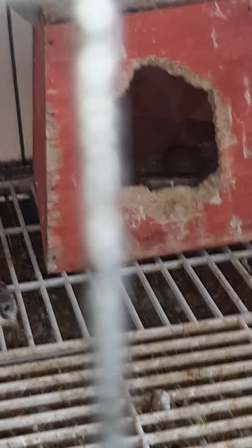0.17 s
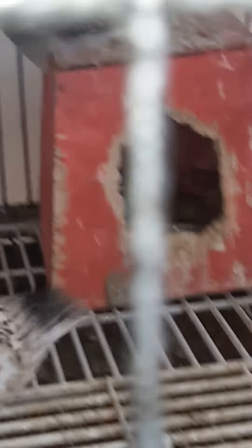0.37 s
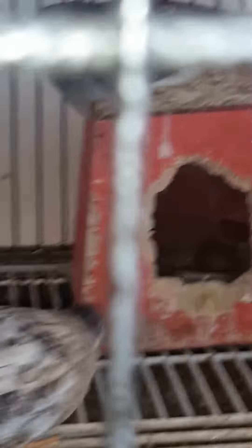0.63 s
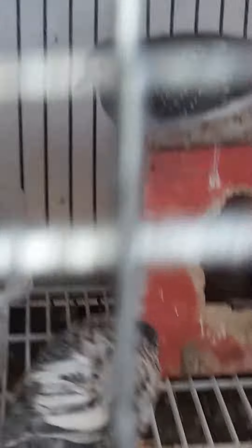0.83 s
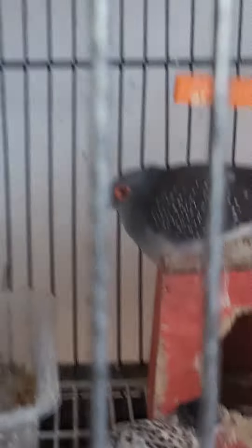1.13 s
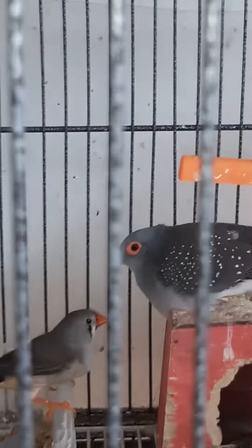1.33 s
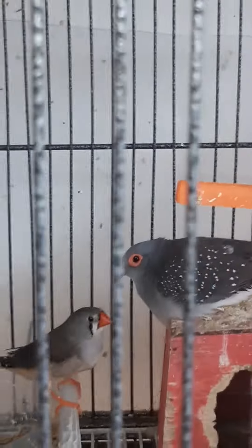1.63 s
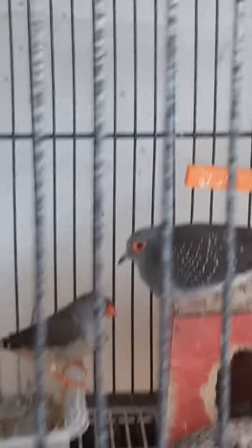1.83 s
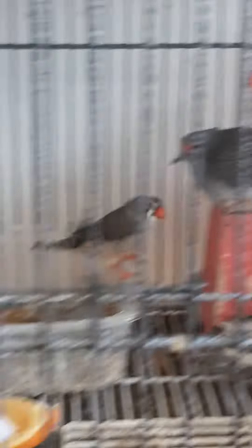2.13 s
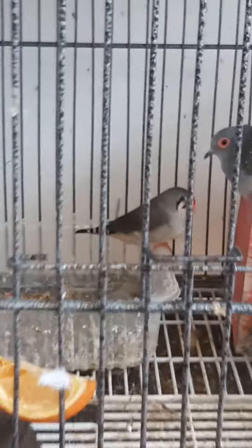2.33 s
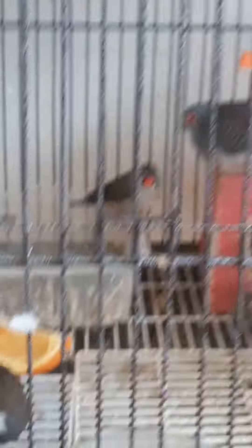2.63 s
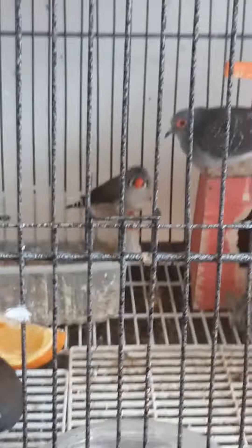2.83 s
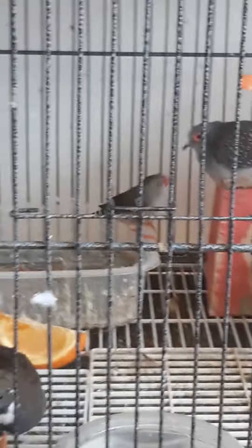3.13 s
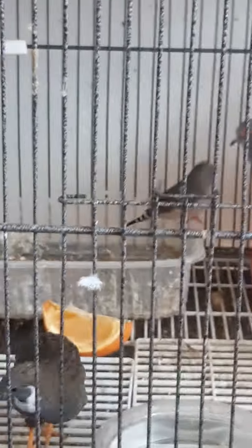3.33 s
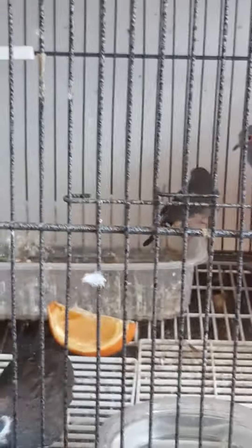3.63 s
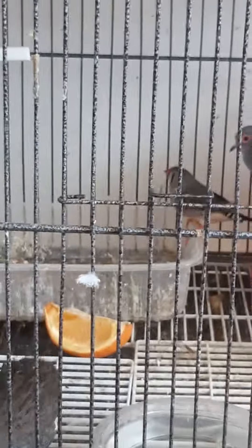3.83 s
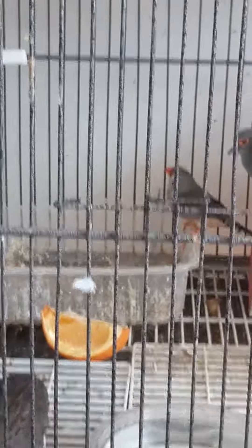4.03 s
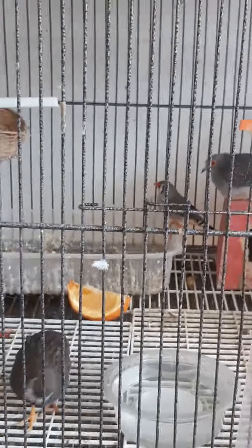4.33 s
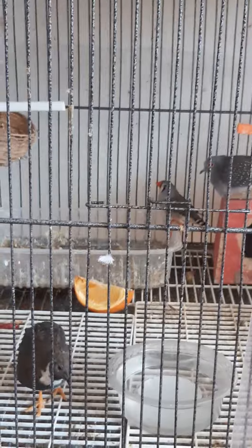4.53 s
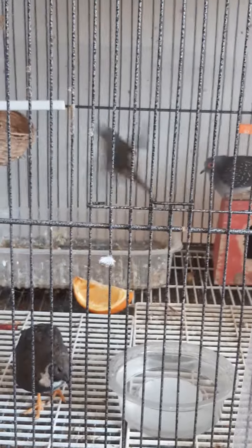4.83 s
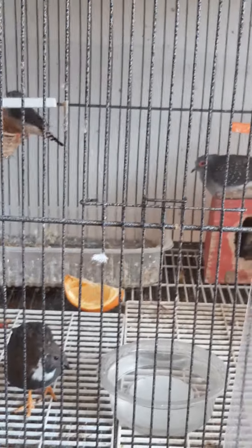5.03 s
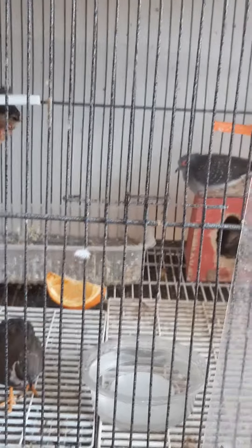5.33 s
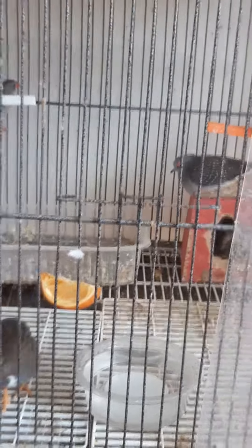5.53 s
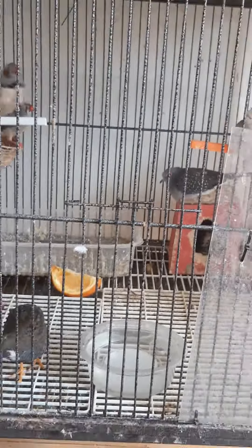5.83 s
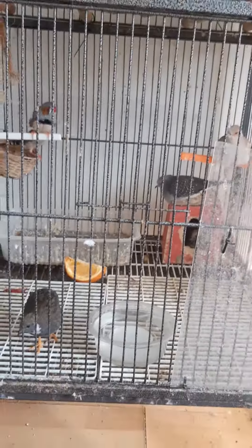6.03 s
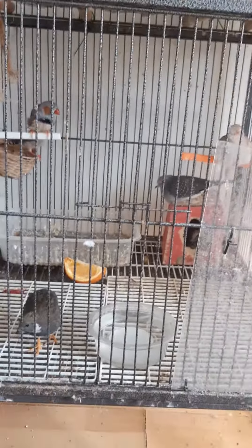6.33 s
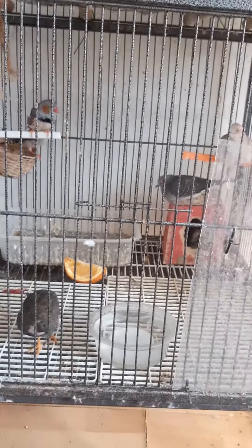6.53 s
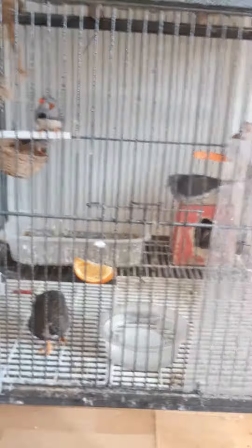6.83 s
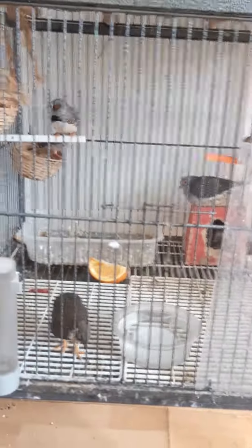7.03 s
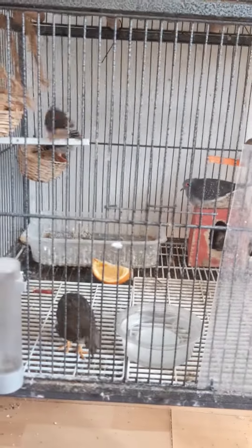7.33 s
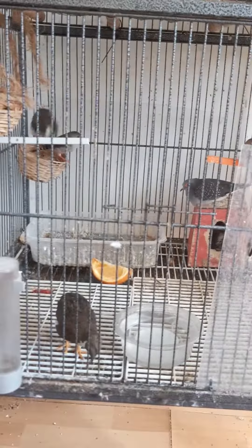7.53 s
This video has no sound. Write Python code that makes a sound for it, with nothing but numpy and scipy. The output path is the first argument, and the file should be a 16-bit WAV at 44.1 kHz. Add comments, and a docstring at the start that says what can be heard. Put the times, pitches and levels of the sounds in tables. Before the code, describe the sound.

Small birds call in a wire cage close to a hand-held microphone, in a hard-walled room that rings briefly. Short squawks and a loud raspy chirp fill the first 0.7 seconds. The wires rattle at about 1.3 seconds with a low bump, and nasal finch beeps follow around 2 seconds. Loud chirps come at 2.5, 3.9, 4.5 and 5.4 seconds, with thin whistles just after 3. From about 3.8 to 5 seconds, feet and wings rustle, rattle the wires and knock dully on perches. A steady run of falling finch calls lasts from 4 to 6 seconds. A quick flurry of loud, harsh squawks runs from 5.8 to 6.3 seconds. Softer beeps follow, then a last loud chirp near 7 seconds, and beeps and whistles until about 7.7. Faint calls, rustling and low hand rumble lie underneath throughout.

```python
"""In a hard-walled room, small birds call in a wire cage close to hand-held microphones.
One bird gives loud chirps and squawks, made of two gliding voices with a rasp of air.
Finches give falling calls and nasal beeps, built from harmonics, and thin, nearly pure whistles.
Feet and wings rattle the wires (bursts of noise) and knock on perches (short ringing tones).
Faint calls, rustling and low hand rumble lie underneath; the room rings after calls and knocks."""
import sys
import numpy as np
from scipy import signal
from scipy.fft import rfft, irfft, next_fast_len
from scipy.io import wavfile
from scipy.ndimage import uniform_filter1d

SR = 44100
rng = np.random.default_rng(int(sys.argv[2]) if len(sys.argv) > 2 else 0)


def put_to_file(sound):
    """Save the sound as 16-bit audio at rate SR, in the file named by the first command-line argument."""
    columns = np.atleast_2d(sound).T  # one column per channel
    safe = np.clip(columns, -1, 1)
    whole_steps = np.round(safe * 32767)
    wavfile.write(sys.argv[1], SR, whole_steps.astype(np.int16))


N = 338943  # length in samples
EDGE_HZ = 15900  # nearly all sound lies below this
# Levels in the tables are those before the final mix in scene().


def amp(db):
    """Turns decibels into a gain."""
    return 10 ** (np.asarray(db) / 20)


def unit(x):
    """Scales a sound to an rms of 1."""
    return x / np.sqrt(np.mean(x ** 2) + 1e-20)


def read(points, hz):
    """Reads a table between its points, along a log-frequency axis."""
    f, value = np.transpose(points)
    return np.interp(np.log(hz + 1), np.log(f + 1), value)


def add(mix, s, sound):
    """Mixes a sound in at time s, in seconds."""
    part = mix[max(round(s * SR), 0):][:len(sound)]
    part += sound[:len(part)]


def play(source, rows):
    """Mixes one sound for each row of a table."""
    mix = np.zeros(N)
    for row in rows:
        add(mix, *source(*row))
    return mix


def noise(colour, size):
    """Makes steady noise of rms 1 by shaping white noise with a spectrum."""
    n = next_fast_len(size)
    spectrum = rfft(rng.standard_normal(n)) * amp(read(colour, np.fft.rfftfreq(n, 1 / SR)))
    return unit(irfft(spectrum, n)[:size])


def wobble(hz, size):
    """Makes a smooth random waver, about 1 in rms and mostly slower than hz."""
    run_in = SR // 20  # lets the filter settle
    low_pass = signal.butter(2, hz, fs=SR)
    return unit(signal.lfilter(*low_pass, rng.standard_normal(size + run_in)))[-size:]


def voice(hz, throat, tilt_db, count):
    """Sums harmonics of a vibrating membrane, weighted by the throat; also returns their power."""
    turns = np.cumsum(hz) / SR
    lag = rng.random((count, 1))  # the throat delays each harmonic differently
    k = np.arange(1, count + 1)[:, None]
    height = amp(read(throat, k * abs(hz)) + tilt_db * np.log2(k)) * (k * hz < EDGE_HZ)
    tone = (height * np.sin(2 * np.pi * (k * turns + lag))).sum(0)
    return tone, (height ** 2).sum(0) / 2


# How the throat colours the voices: (frequency [Hz], level [dB])
CHIRP_THROAT = [(1500, -6.5), (2200, -2.5), (2900, -2), (3600, -1.5), (4600, -5), (5500, -22.5),
                (6200, -21), (7200, -15), (9000, -37.5), (11000, -29.5), (14000, -15), (16000, -21.5)]
# Colour of the rasp of air: (frequency [Hz], level [dB])
RASP_COLOUR = [(500, -39), (1200, -38), (1900, -11), (3000, -6.5), (4200, 5.5), (6000, 2.5), (7500, -11),
               (9000, -25), (13500, -18.5), (16000, -24.5)]


def syrinx(low_hz, high_hz, rough, jitter=0.112, shimmer=0.98, rasp=0.63, tilt_db=-8.5,
           upper_db=1.0, enter_s=0.004):
    """The two sides of the syrinx each sing their own pitch, with a rasp of air when they are rough."""
    t = np.arange(len(low_hz)) / SR
    lower = 1 - np.exp(-t / enter_s)  # the lower side joins in a little later
    sound, power = 0, 0
    for hz, share in (low_hz, lower), (high_hz, amp(upper_db)):
        # a rough membrane shakes in pitch and in strength
        shake = jitter * rough * wobble(584, len(t)) + 0.01882 * wobble(95.0, len(t))
        tone, tone_power = voice(hz * (1 + shake), CHIRP_THROAT, tilt_db, count=7)
        sound = sound + share * tone * (1 + shimmer * rough * wobble(300, len(t)))
        power = power + share ** 2 * tone_power
    air = rasp * rough ** 3 * noise(RASP_COLOUR, len(t))
    return (sound / np.sqrt(power) + air) * signal.windows.tukey(len(t), .06)


# Loud two-voiced chirps: (time the voices meet [s], lead-in [s], time until they part [s],
# meeting pitch [Hz], level [dB], rise [dB/s], ending relative to level [dB], basic roughness [0-1])
CHIRPS = [(.285, .12, .025, 2913, -15, 179.5, -1.5, 0.54),
          (2.508, 0.1, 0.018, 2850, -13, 253.5, -5.5, 0.48),
          (3.866, 0.11, .03, 3039, -13.5, 174, -4.5, 0.58), (4.48, .1, 0.025, 2966, -17, 144, 3.5, 0.49),
          (5.382, .075, .026, 2873, -16, 276, -1, 0.43), (7.06, .091, 0.038, 2965, -13, 223, 0, 0.44)]
# the (lower, upper) voice as multiples of the meeting pitch
APART, MET, PARTED = (.79, 1.29), (0.9, 1.025), (1.01, 1.19)
CLOSE_S, FLICK_S, SAG_HZ_PER_S = .04, .003, 7980  # glide together, flick apart, sag between
# full level lasts from FULL_S before they meet to ENDING_S after they part
FULL_S, ENDING_S, FALL_DB_PER_S, RELEASE_S = 0.011, 0.014, 479, .05
MET_ROUGH, START_ROUGH, START_S = 0.13, .3, 0.032  # when met; extra at the start, and its fading time


def chirp(meet_s, lead_s, part_s, hz, level_db, rise_db_per_s, ending_db, rough):
    """The voices start harsh and apart, swell, meet in one clear sagging note, then flick apart and die."""
    t = np.arange(-lead_s, part_s + RELEASE_S, 1 / SR)
    apart = 1 - np.exp(-(np.minimum(t, 0) / CLOSE_S) ** 2)
    parted = .5 + .5 * np.tanh((t - part_s) / FLICK_S)
    met = 1 - apart - parted
    sag_hz = SAG_HZ_PER_S * np.maximum(t, 0) * met
    low_hz, high_hz = (hz * (a * apart + m * met + p * parted) - sag_hz
                       for a, m, p in zip(APART, MET, PARTED))
    swell_db = rise_db_per_s * np.minimum(t + FULL_S, 0)
    fall_db = FALL_DB_PER_S * np.maximum(t - part_s - ENDING_S, 0)
    rough = rough + (MET_ROUGH - rough) * met + START_ROUGH * np.exp(-(t + lead_s) / START_S)
    sound = syrinx(low_hz, high_hz, rough, enter_s=0.0089, tilt_db=-7.5, jitter=0.094, rasp=0.99)
    return meet_s - lead_s, amp(level_db + swell_db - fall_db + ending_db * parted) * sound


# Whines and squawks on two voices: (time [s], length [s], lower mid-call pitch [Hz], its glide [octaves],
# upper mid-call pitch [Hz], its glide [octaves], level [dB], roughness [0-1])
SQUAWKS = [(0, 0.017, 2126, 0, 4140, -0.14, -28, 0.4), (0.017, 0.037, 2270, -0.079, 4460, -0.15, -29, 0.28),
           (0.073, 0.033, 2238, -0.048, 4300, 0.1, -28.5, 0.56),
           (.115, .05, 2180, -0.031, 4280, -0.08, -29.5, 0.45),
           (0.533, 0.033, 2550, 0.322, 4700, 0.18, -21.5, 0.29),
           (0.564, 0.038, 2754, .35, 3640, -0.07, -21.5, 0.42),
           (0.616, 0.03, 2798, 0.33, 3304, 0.39, -22, 0.4),
           (5.775, 0.029, 4130, -0.24, 4700, -.2, -34, 0.62),
           (5.808, 0.0336, 3360, 0.14, 3920, 0.18, -17.5, 0.21),
           (5.854, 0.0425, 2740, 0.096, 3794, -0, -17.5, 0.44),
           (5.913, 0.033, 3140, -0.027, 3233, 0, -17, 0.1),
           (5.949, 0.0644, 2353, -0.157, 3175, -.14, -23.5, 0.5),
           (6.134, .053, 2735, -.05, 4120, -0.63, -17, 0.59),
           (6.192, 0.035, 2830, 0.0053, 3380, 0.03, -12, 0.47),
           (6.23, .07, 2892, 0.024, 3245, 0.17, -17, 0.77)]
SQUAWK_EDGE_DB = -9  # each one swells from this far down and fades again
SQUAWK_TILT_DB = -6  # overtones, per octave


def squawk(s, length, low_hz, low_glide, high_hz, high_glide, level_db, rough):
    """Both voices of the syrinx glide under one arch of loudness."""
    u = np.linspace(-.5, .5, int(length * SR))
    sound = syrinx(low_hz * 2 ** (low_glide * u), high_hz * 2 ** (high_glide * u), rough,
                   tilt_db=SQUAWK_TILT_DB, upper_db=-3.0, shimmer=0.99, rasp=1.58)
    return s, amp(level_db + SQUAWK_EDGE_DB * (2 * u) ** 2) * sound


def stack(length, top_hz, octaves, hold, rough, throat, scoop=0.1206, jitter=0.12, close_db=-3.0,
          rasp=1.0, swell=5.3, fade_db=-12.0, slack=.29):
    """A stack of harmonics scoops up to its pitch, holds, then slides down and dulls."""
    t = np.arange(int(length * SR)) / SR
    drop = octaves * np.clip((t / length - hold) / max(1 - hold, .05), 0, 1)
    hz = top_hz / 2 ** drop * (1 - scoop * np.exp(-t / 0.00689))
    # a slack membrane shakes more and gives weaker overtones and more hiss
    rough = rough + slack * drop
    shaken_hz = hz * (1 + jitter * rough * wobble(390, len(t)))
    tone, power = voice(shaken_hz, throat, close_db * drop, count=28)
    sound = tone / np.sqrt(power) + rasp * rough * noise(throat, len(t))
    onset = 1 - np.exp(-t * top_hz / swell)  # the vibration builds up over several cycles
    return amp(fade_db * drop) * sound * onset * signal.windows.tukey(len(t), .15)


# How the open beak colours a call: (frequency [Hz], level [dB])
TET_THROAT = [(500, -10), (800, -14.5), (1300, -2), (1900, 0.5), (2700, -3.5), (3300, 6.5), (4100, 5),
              (5200, 2), (7000, -16), (9000, -40), (13000, -26), (16000, -48)]
# Falling "tet" calls: (time [s], length [s], top pitch [Hz], fall [octaves], level [dB])
TETS = [(0.298, 0.073, 1200, 0.77, -28.5), (2.649, 0.041, 2330, 0.33, -33), (2.855, .045, 1255, 0.22, -30),
        (3.554, .046, 1124, 0.24, -49), (3.67, 0.052, 1154, 0.38, -43), (4.145, 0.091, 1392, 1.2, -30),
        (4.31, 0.079, 1350, 1.14, -31.5), (4.467, 0.095, 1332, 1.07, -29.5),
        (4.755, 0.07, 1323, 0.091, -39.5), (4.911, 0.089, 1418, 0.39, -34), (5.083, .09, 1302, .38, -34),
        (5.248, 0.063, 1307, 0.62, -33), (5.624, .085, 1338, 0.94, -37), (5.782, 0.073, 1345, 1.07, -27),
        (5.953, .086, 1340, 1, -30.5)]
TET_HOLD, TET_ROUGH = .35, 0.21  # share of the length before the fall; roughness before the fall, 0-1
TET_FADE_DB = -3.5  # per octave of fall


def tet(s, length, top_hz, octaves, level_db):
    """A high falling call comes through an open beak."""
    sound = stack(length, top_hz, octaves, TET_HOLD, TET_ROUGH, TET_THROAT, fade_db=TET_FADE_DB,
                  close_db=-5.5, slack=0.14, jitter=0.15, rasp=.65, swell=6.0)
    return s, amp(level_db) * sound


# How the nearly closed beak colours a call: (frequency [Hz], level [dB])
BEEP_THROAT = [(500, -17), (800, -18.5), (1200, -7), (1800, -4.5), (2600, 1.5), (3200, -2), (4000, -5),
               (5200, -9), (7000, -23), (9000, -32), (13000, -26.5), (16000, -33.5)]
# Low nasal beeps: (time [s], length [s], top pitch [Hz], fall [octaves], level [dB])
BEEPS = [(1.11, 0.039, 915, 0.64, -42), (1.847, 0.1, 521, 0.097, -37), (2.007, 0.094, 540.6, 0.11, -32),
         (2.117, 0.047, 640, .37, -35), (2.236, 0.047, 808, 0.33, -35.5), (2.88, .08, 840, 0.51, -32.5),
         (3.097, .056, 775, 0.27, -44.5), (5.719, 0.087, 527, 0.051, -46), (6.491, .076, 547, 0.133, -36),
         (6.681, 0.033, 688, 0.48, -43.5), (6.763, 0.056, 530, 0.16, -40), (7.424, .1, 542.4, 0.11, -36.5),
         (7.525, 0.088, 573, 0.11, -39)]
BEEP_HOLD, BEEP_ROUGH_PER_OCTAVE = .32, 1  # share before the fall; the further it falls, the rougher
BEEP_FADE_DB = -5  # per octave of fall


def beep(s, length, top_hz, octaves, level_db):
    """A low nasal call comes through a nearly closed beak."""
    rough = BEEP_ROUGH_PER_OCTAVE * octaves
    sound = stack(length, top_hz, octaves, BEEP_HOLD, rough, BEEP_THROAT, fade_db=BEEP_FADE_DB, swell=7.7)
    return s, amp(level_db) * sound


# Thin whistles: (time [s], length [s], first pitch [Hz], last pitch [Hz], level [dB])
WHISTLES = [(0.514, 0.0326, 4650, 4720, -26), (1.057, 0.05, 3220, 3210, -58),
            (3.19, 0.058, 1200, 1280, -41.5), (3.248, 0.087, 2915, 1950, -36),
            (3.321, 0.02, 2000, 1350, -34), (3.423, 0.11, 2680, 2710, -45.5),
            (3.579, 0.049, 2264, 2060, -46.5), (3.995, 0.033, 4170, 4650, -31.5),
            (6.094, 0.072, 6220, 5290, -33), (6.096, 0.046, 3100, 2804, -29.5),
            (6.47, 0.036, 584, 840, -41.5), (6.936, 0.089, 3420, 3490, -42),
            (7.398, 0.095, 2650, 2072, -34), (7.406, .077, 7520, 6170, -48),
            (7.58, 0.075, 4870, 3470, -44.5), (7.6, 0.045, 2357, 1387, -38), (7.668, .03, 2370, 2520, -34)]


def whistle(s, length, first_hz, last_hz, level_db, jitter=0.02):
    """A nearly pure tone with weak overtones glides from one pitch to another, trembling slightly."""
    size = int(length * SR)
    hz = np.geomspace(first_hz, last_hz, size) * (1 + jitter * wobble(400, size))
    tone, power = voice(hz, CHIRP_THROAT, -11.5, count=3)
    return s, amp(level_db) * tone / np.sqrt(power) * signal.windows.tukey(size, .4)


# Colour of the rattling wires: (frequency [Hz], level [dB])
WIRE_COLOUR = [(88, -29), (150, -24), (428, -17), (500, -27), (561, -9), (1800, -9), (3220, -13),
               (4390, -12), (6730, -14.5), (8660, -30), (15500, -21)]
# Feet and wings on the wires: (time [s], level [dB], time to die by 60 dB [s])
RATTLES = [(.806, -44, 0.12), (1.257, -26.5, 0.11), (1.326, -37, 0.094), (1.347, -28, 0.021),
           (1.443, -42.5, 0.048), (1.502, -43, 0.051), (1.985, -46, 0.23), (2.332, -41, 0.051),
           (2.414, -40, 0.13), (2.837, -38.5, 0.086), (3.506, -64, 0.049), (3.78, -32, 0.1),
           (4.048, -35, .15), (4.842, -35.5, 0.18), (5.532, -39.5, .03), (6.584, -41, 0.023)]


def rattle(s, level_db, t60, chatter_db=3.0):
    """Many wires chatter against each other after a blow: wavering noise that dies away."""
    size = SR // 4
    t = np.arange(size) / SR
    wires = unit(noise(WIRE_COLOUR, size) * amp(chatter_db * wobble(800, size)))
    return s, amp(level_db - 60 * t / t60) * wires


# Dull knocks on perch and cage: (time [s], level [dB], pitch [Hz])
KNOCKS = [(1.259, -33.5, 387), (1.326, -33, 325), (1.5, -29.5, 635), (1.985, -36, 726), (2.972, -38.5, 363),
          (3.783, -21, 683), (3.94, -31, 510), (4.04, -33, 570), (4.606, -29.5, 710), (4.628, -21, 670),
          (4.7, -25.5, 824), (4.842, -29, 764), (5.532, -33, 403), (6.2, -40, 64.4), (6.249, -42, 65.5),
          (6.503, -34, 836), (6.865, -40, 930)]


def knock(s, level_db, hz, cycles=16.8):
    """A soft blow rings a few heavily damped modes, dying by 60 dB in a set number of cycles."""
    t = np.arange(SR // 3) / SR
    modes = [(.6, -9.5), (.8, -2.5), (1, 0), (1.3, -4.5), (2.1, -24)]  # (multiple of the pitch, level [dB])
    ring = sum(amp(db) * np.sin(2 * np.pi * (hz * k * t + rng.random())) for k, db in modes)
    onset = 1 - np.exp(-t * hz / 0.43)
    return s, amp(level_db - 60 * t * hz / cycles) * ring * onset


def chatter(rate=9, above_db=5, fall=.6, rough=.08):
    """Birds further away give faint calls at random, louder when the rustle is louder; rate is per second."""
    mix, spread_db = np.zeros(N), 4
    for when, pitch, span, slide, strength in rng.random((int(rate * N / SR), 5)):
        s, hz = when * N / SR, 520 * 2.7 ** pitch
        throat = TET_THROAT if hz > 1000 else BEEP_THROAT
        level_db = np.interp(s, *np.transpose(RUSTLE)) + above_db + spread_db * (2 * strength - 1)
        call = stack(0.022 + 0.044 * span, hz, fall * slide, 0.49, rough, throat)
        add(mix, s, amp(level_db) * call)
    return mix


def bed(level_db, colour, apart, grain_db):
    """Grainy noise follows a changing level, partly shared by left and right."""
    grain = amp(grain_db * unit(uniform_filter1d(rng.standard_normal(N), 300)))
    mid = unit(noise(colour, N) * grain)
    side = unit(noise(colour, N) * grain)
    return amp(level_db) * np.array([mid + apart * side, mid - apart * side])


# Colour of wings and litter: (frequency [Hz], level [dB])
RUSTLE_COLOUR = [(20, -36), (60, -25), (250, 5), (700, 9.5), (1300, 13), (2000, 6.5), (4000, 6),
                 (7000, -1.5), (9500, -29.5), (13000, -6.5), (16000, -15.5)]
# Rustle of wings and litter, which also guides the faint calls: (time [s], level [dB])
RUSTLE = [(0.0, -65), (0.56, -65), (1.13, -71), (1.41, -54), (1.65, -88), (1.9, -61), (2.03, -57.5),
          (2.87, -52.5), (3.66, -55), (3.96, -42.5), (4.34, -62), (4.75, -41.5), (5.67, -52.5), (5.87, -48),
          (6.29, -59.5), (7.32, -56), (7.51, -59), (7.69, -55)]


def rustle():
    """Wings and litter stir without pause: grainy noise rising and falling."""
    level_db = np.interp(np.arange(N) / SR, *np.transpose(RUSTLE))
    return bed(level_db, RUSTLE_COLOUR, apart=0.64, grain_db=2.5)


# Colour of the hand rumble: (frequency [Hz], level [dB])
HANDLING_COLOUR = [(20, -32), (45, -37.5), (64, 1), (85, -1), (150, -4.5), (220, -3.5), (350, -5),
                   (1000, -38.5), (4000, -100.5)]
# Low bumps of the holding hand: (time [s], hold [s], level [dB])
BUMPS = [(0.477, .02, -54), (.835, 0.031, -49.5), (1.253, .11, -42.5), (1.48, 0.029, -49.5),
         (1.973, 0.018, -56), (2.94, .03, -57), (3.806, .02, -55), (3.93, 0.051, -50), (4.641, 0.3, -43.5),
         (5.527, 0.018, -50.5), (5.811, 0.044, -48), (6.2, 0.11, -49), (6.855, 0.074, -55.5)]
BUMP_RISE_DB_PER_S, BUMP_FALL_DB_PER_S = 380, 136
HAND_FLOOR_DB, HAND_SWAY_DB = -72, 6.5  # rumble between bumps, and how far it wavers (rms)


def handling():
    """Each bump of the hand rises, holds and dies back into a faint wavering rumble."""
    t = np.arange(N) / SR
    level_db = HAND_FLOOR_DB + HAND_SWAY_DB * wobble(4.9, N)
    for s, hold, db in BUMPS:
        rise_db = BUMP_RISE_DB_PER_S * np.maximum(s - t, 0)
        fall_db = BUMP_FALL_DB_PER_S * np.maximum(t - s - hold, 0)
        level_db = np.maximum(level_db, db - rise_db - fall_db)
    return bed(level_db, HANDLING_COLOUR, apart=.25, grain_db=-1.0)


# How long the room rings: (frequency [Hz], time to die by 60 dB [s])
ROOM = [(200, 0.4), (1000, 0.47), (3000, 0.47), (6000, 0.47), (14000, 0.38)]


def room(x, direct_db, wet_db, right_db, lag_ms, early_db=12.0, early_s=0.0056):
    """Adds to the direct sound a burst of near-wall reflections, then a tail that dies by band."""
    # sparse random echoes, about 4000 a second on each side
    taps = rng.choice([-1., 1.], (2, SR)) * (rng.random((2, SR)) < 4000 / SR)
    hz, t, z = signal.stft(taps, SR, nperseg=256)
    fade = amp(-60 * t / read(ROOM, hz)[:, None] + early_db * np.exp(-t / early_s))
    tail = signal.istft(z * fade, SR, nperseg=256)[1]
    tail[:, :SR // 700] = 0  # a short gap before the first reflection
    wet = signal.fftconvolve(x[None], tail / np.linalg.norm(tail[0]), axes=1)[:, :N]
    # the left side hears the direct sound lag_ms later (earlier if negative)
    delay = np.exp(-2j * np.pi * np.fft.rfftfreq(N, 1 / SR) * lag_ms / 1000)
    left = irfft(rfft(x) * delay, N)
    both = amp(direct_db) * np.array([left, x]) + amp(wet_db) * wet
    return both * amp([[-right_db / 2], [right_db / 2]])


def scene():
    """Mixes birds, cage noises and the quiet beds under them."""
    loud_calls = play(chirp, CHIRPS) + play(squawk, SQUAWKS)
    finch_calls = play(tet, TETS) + play(beep, BEEPS) + play(whistle, WHISTLES)
    loud = room(loud_calls, direct_db=-6.0, wet_db=-0.5, right_db=2.5, lag_ms=-0.31)
    finches = room(finch_calls, direct_db=-4.0, wet_db=0.5, right_db=3.5, lag_ms=-0.27)
    wires = room(play(rattle, RATTLES), direct_db=-2.5, wet_db=2.0, right_db=1.3, lag_ms=0.027)
    knocks = room(play(knock, KNOCKS), direct_db=-1.0, wet_db=1.5, right_db=1.0, lag_ms=0.035)
    far = room(chatter(), direct_db=-10, wet_db=-1, right_db=3, lag_ms=-.2)
    return loud + finches + wires + knocks + far + amp(2.0) * rustle() + amp(-3.0) * handling()


def record(dry):
    """Cuts the lows, rounds the highest peaks with a soft knee, then limits the treble."""
    low_cut = signal.butter(4, 48, "high", fs=SR, output="sos")
    dry = signal.sosfilt(low_cut, dry)
    knee, headroom = .78, .17
    held = np.clip(dry, -knee, knee)
    limited = held + headroom * np.tanh((dry - held) / headroom)
    band_limit = signal.firwin(511, EDGE_HZ, window=("kaiser", 9), fs=SR)
    return signal.oaconvolve(limited, band_limit[None], "same")


dry = scene()
out = record(dry)
put_to_file(out)
```